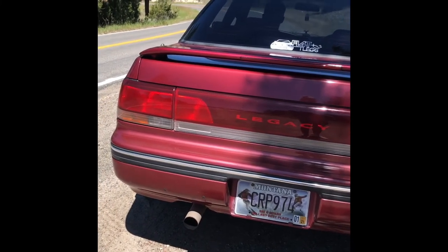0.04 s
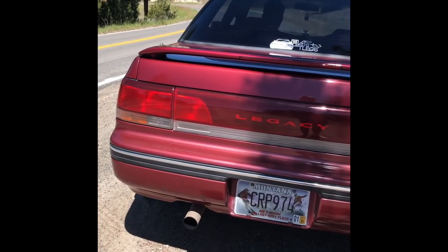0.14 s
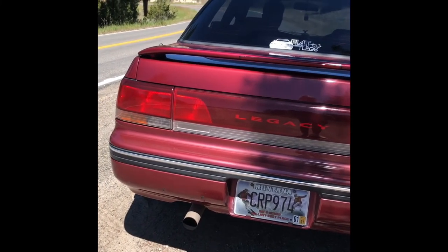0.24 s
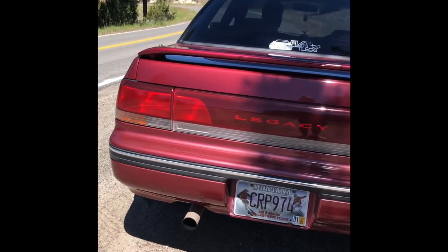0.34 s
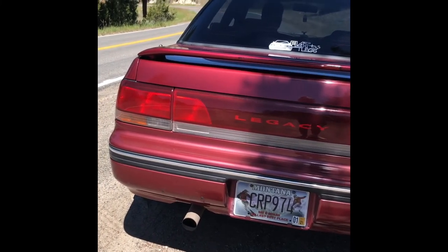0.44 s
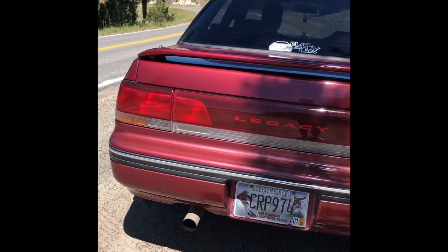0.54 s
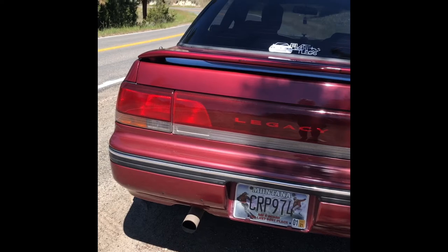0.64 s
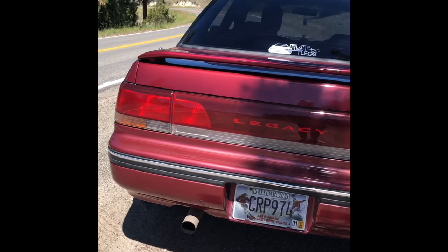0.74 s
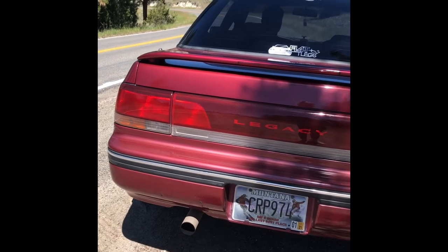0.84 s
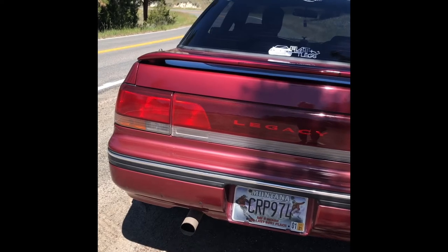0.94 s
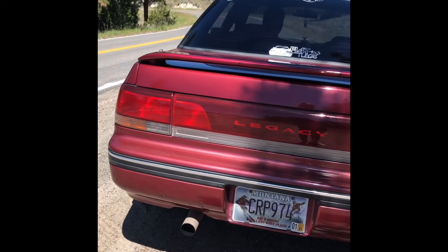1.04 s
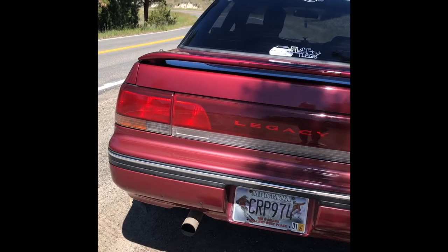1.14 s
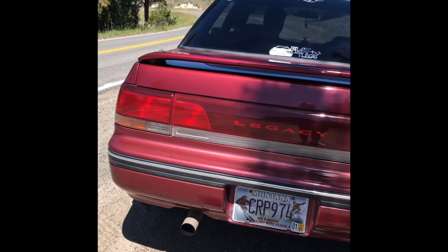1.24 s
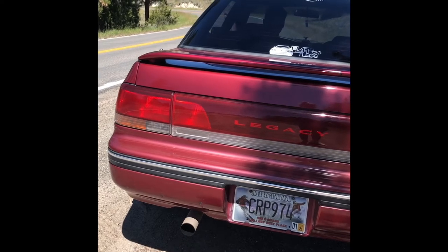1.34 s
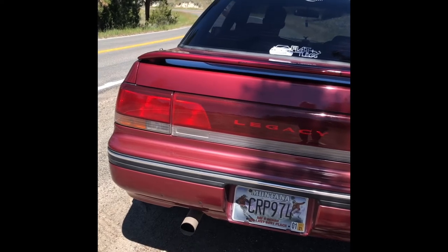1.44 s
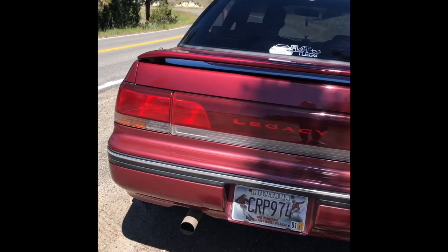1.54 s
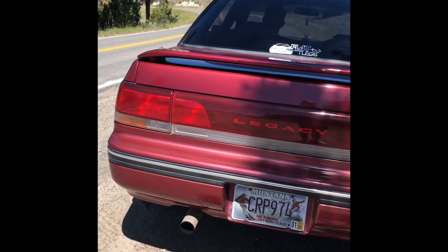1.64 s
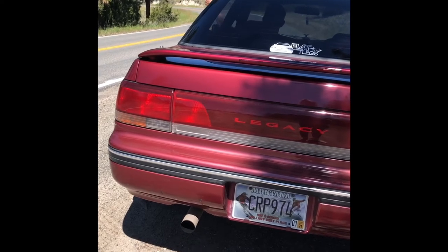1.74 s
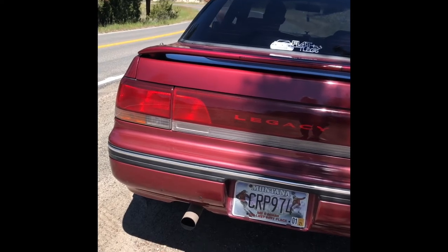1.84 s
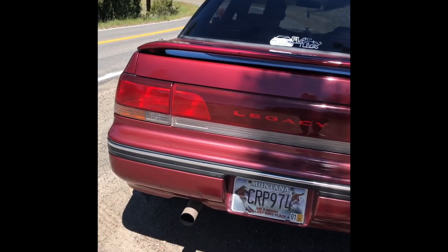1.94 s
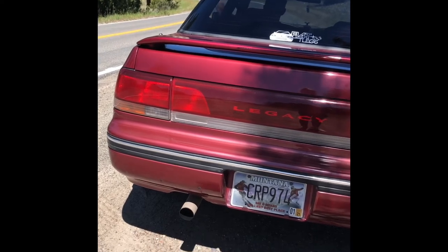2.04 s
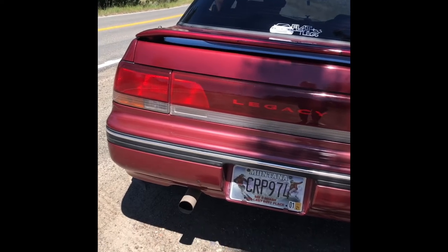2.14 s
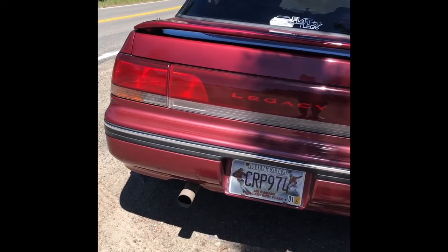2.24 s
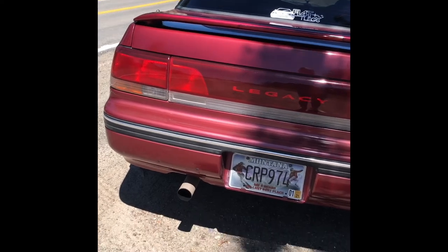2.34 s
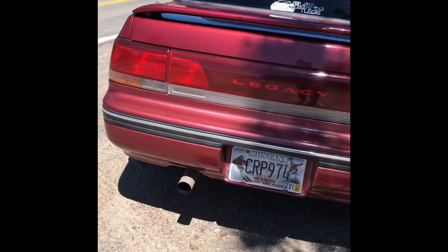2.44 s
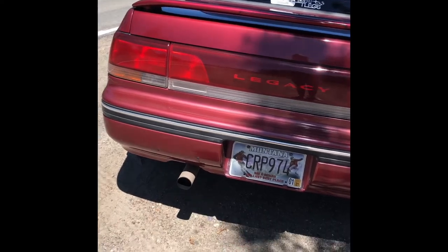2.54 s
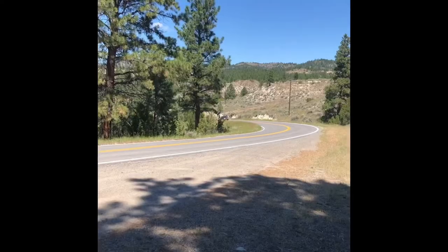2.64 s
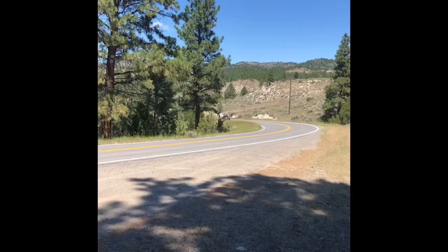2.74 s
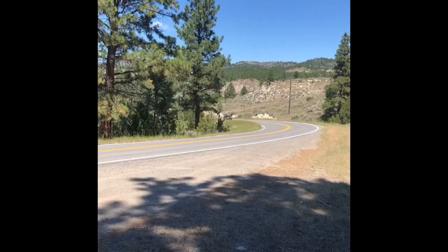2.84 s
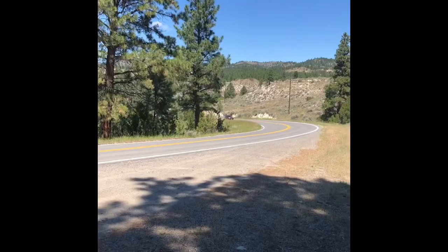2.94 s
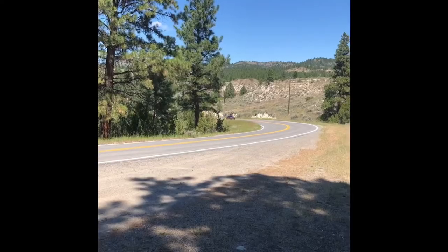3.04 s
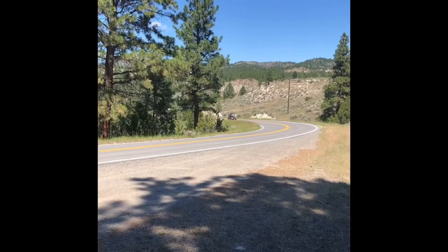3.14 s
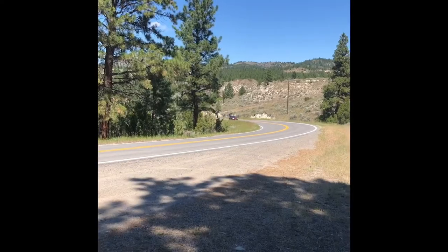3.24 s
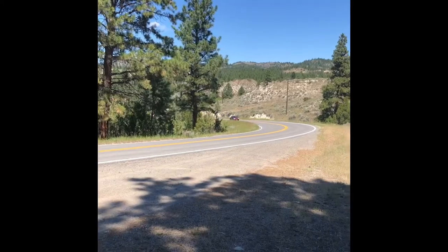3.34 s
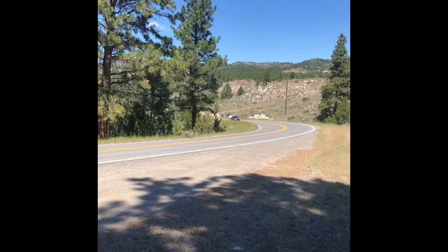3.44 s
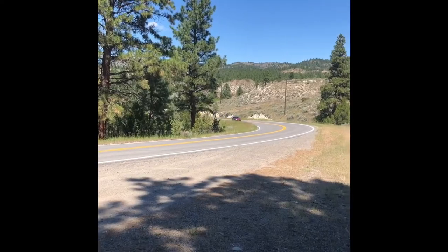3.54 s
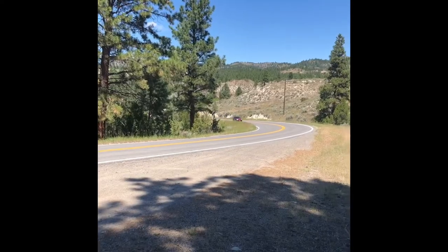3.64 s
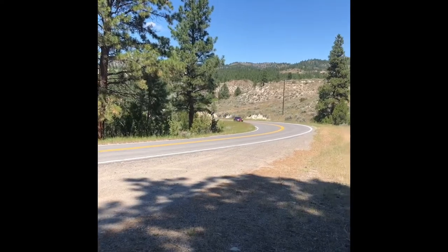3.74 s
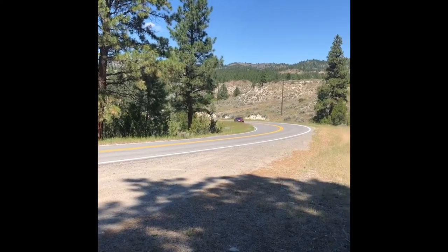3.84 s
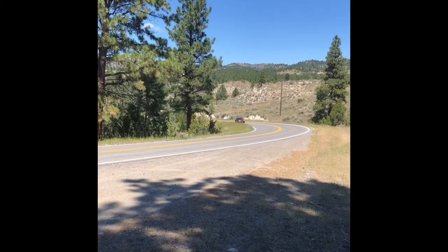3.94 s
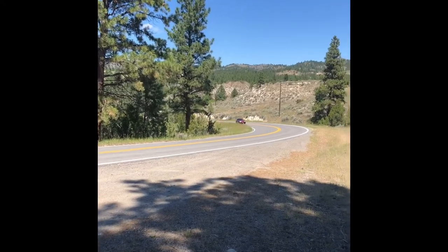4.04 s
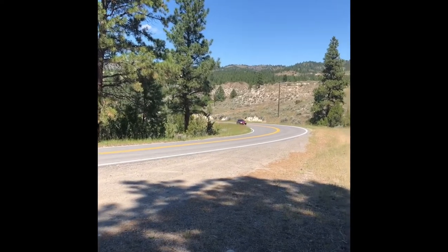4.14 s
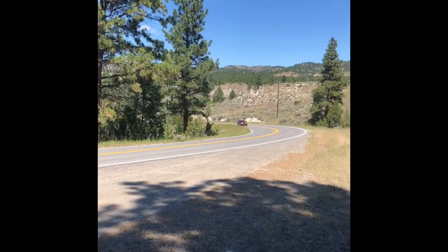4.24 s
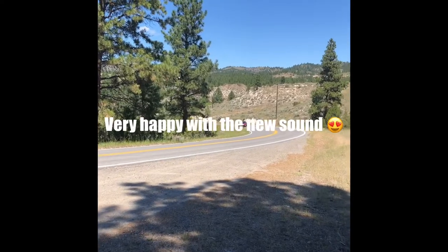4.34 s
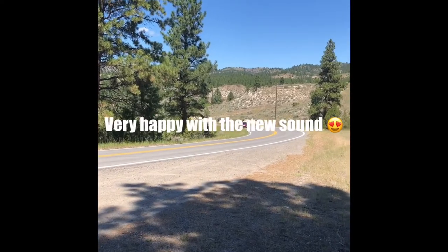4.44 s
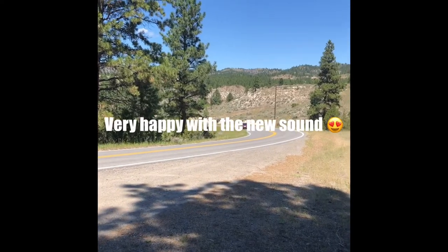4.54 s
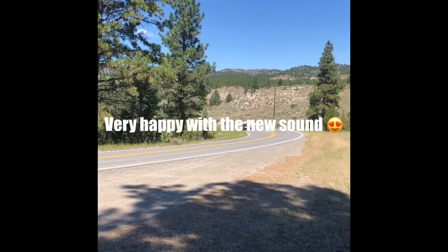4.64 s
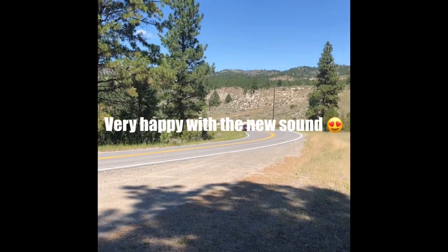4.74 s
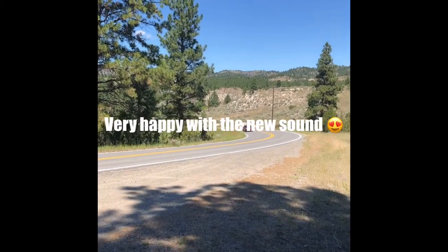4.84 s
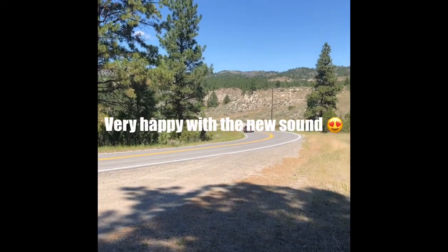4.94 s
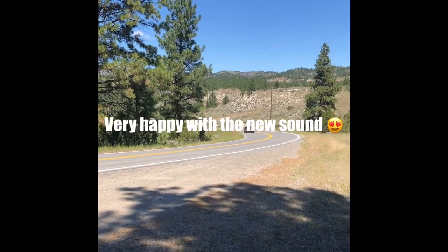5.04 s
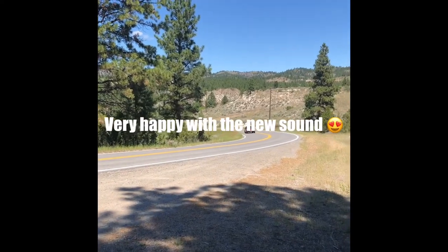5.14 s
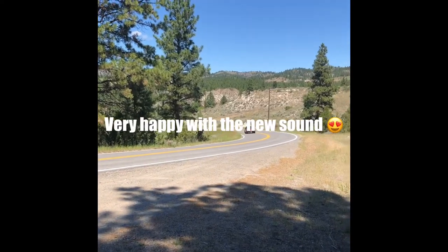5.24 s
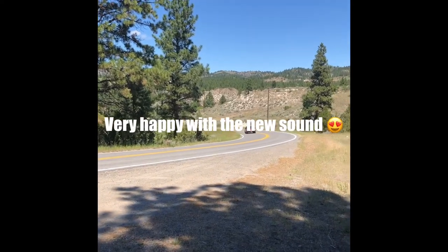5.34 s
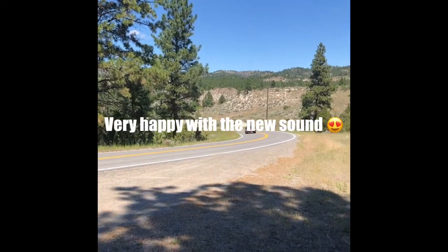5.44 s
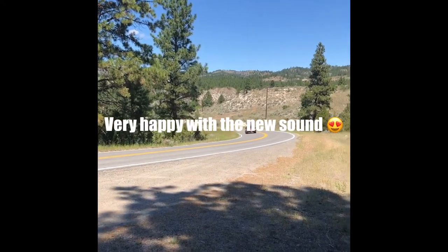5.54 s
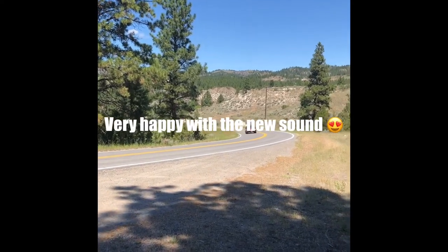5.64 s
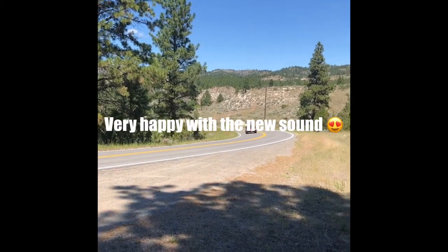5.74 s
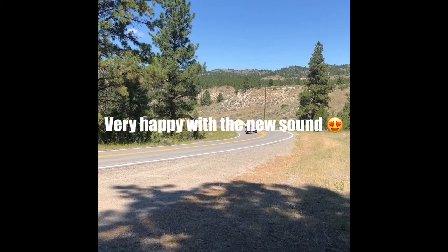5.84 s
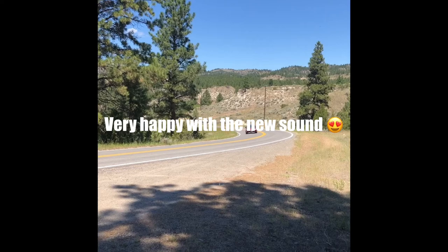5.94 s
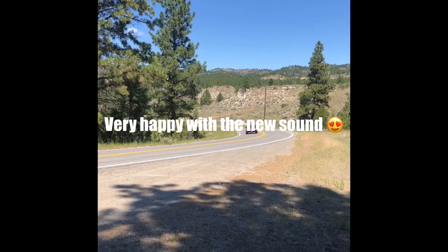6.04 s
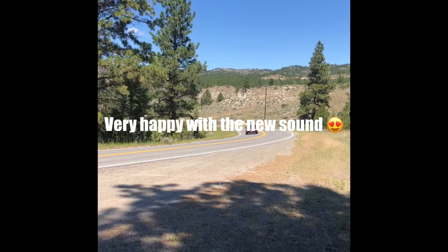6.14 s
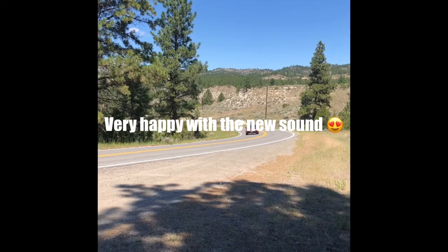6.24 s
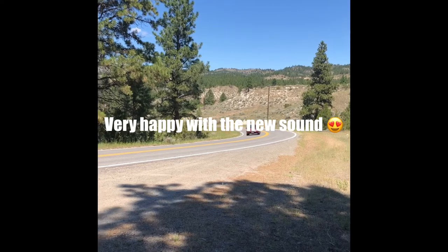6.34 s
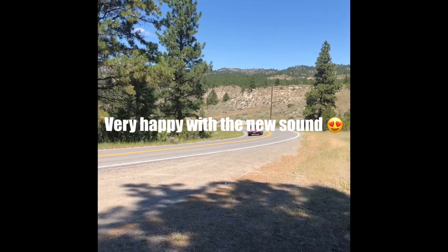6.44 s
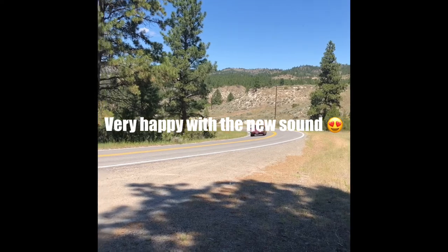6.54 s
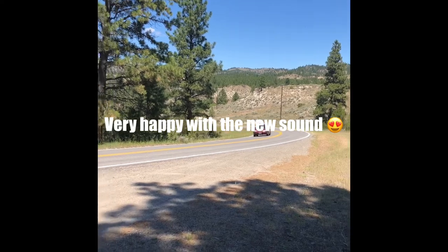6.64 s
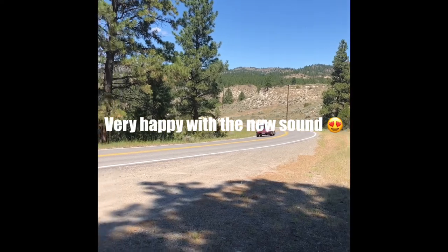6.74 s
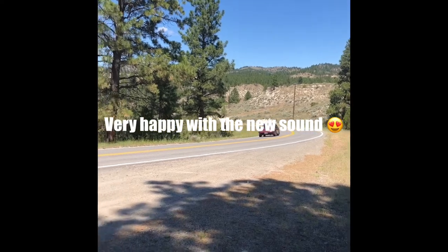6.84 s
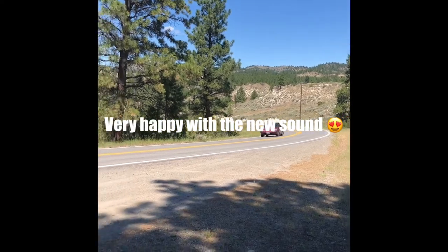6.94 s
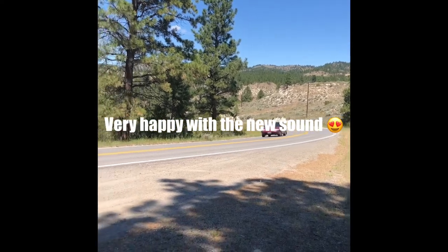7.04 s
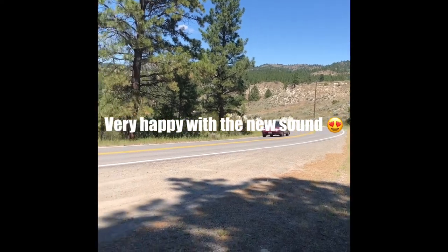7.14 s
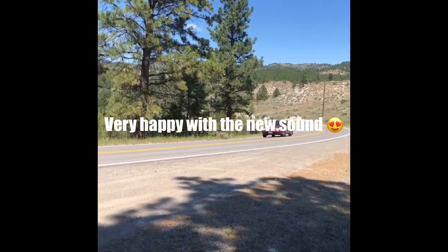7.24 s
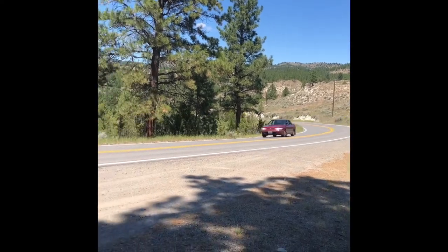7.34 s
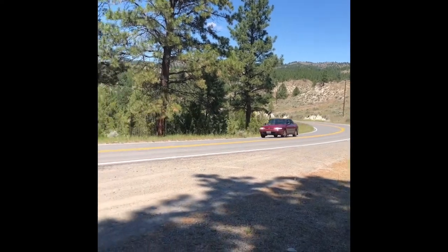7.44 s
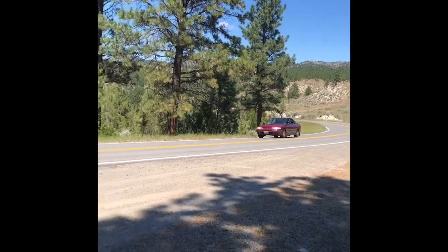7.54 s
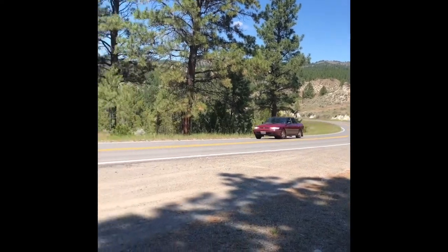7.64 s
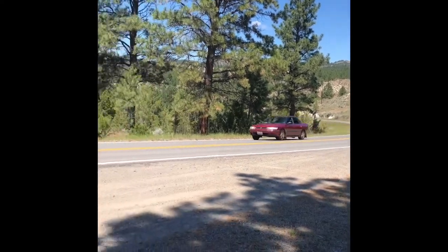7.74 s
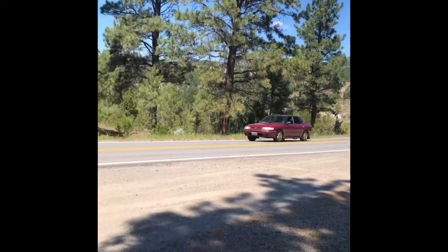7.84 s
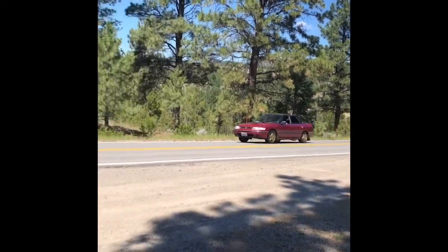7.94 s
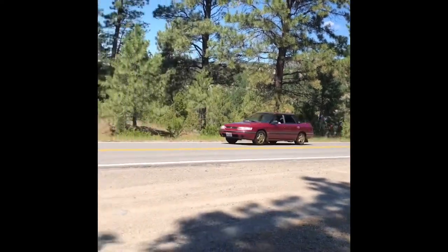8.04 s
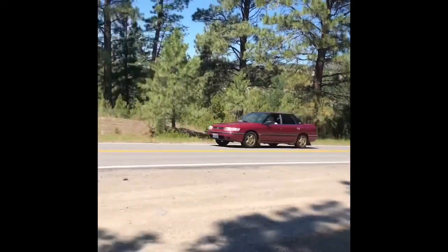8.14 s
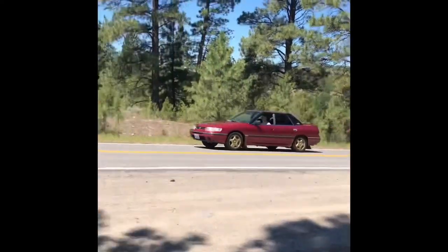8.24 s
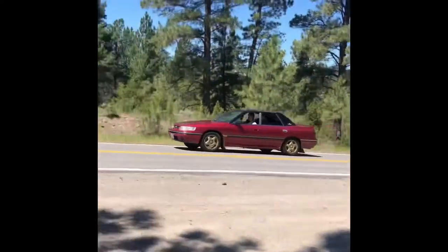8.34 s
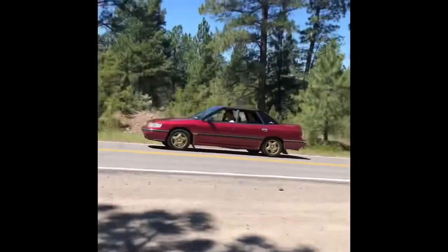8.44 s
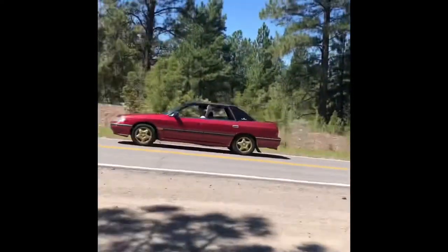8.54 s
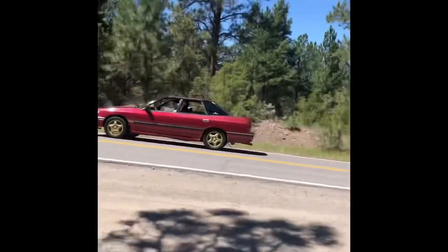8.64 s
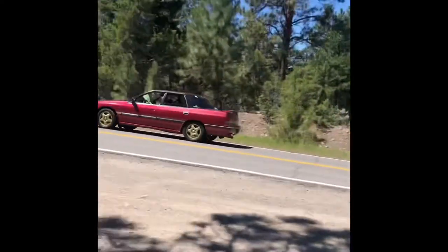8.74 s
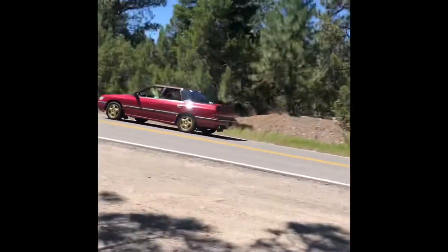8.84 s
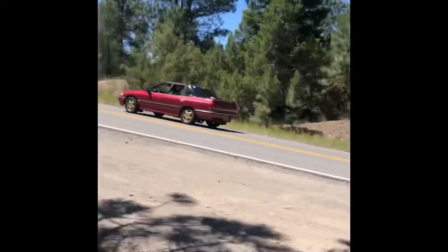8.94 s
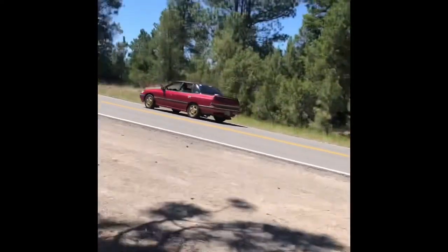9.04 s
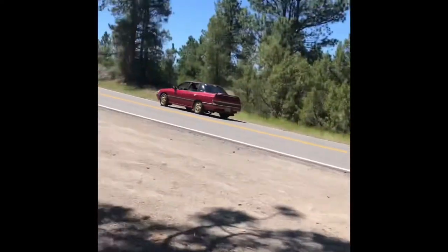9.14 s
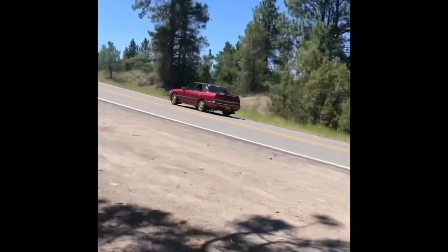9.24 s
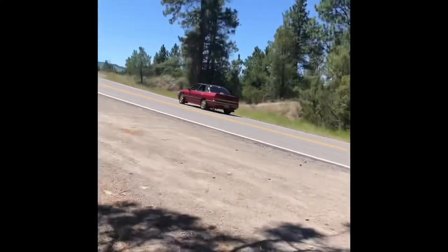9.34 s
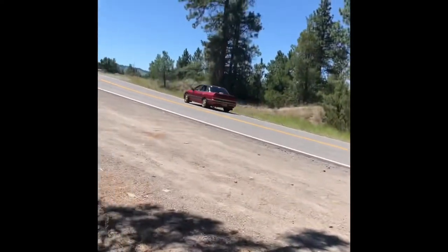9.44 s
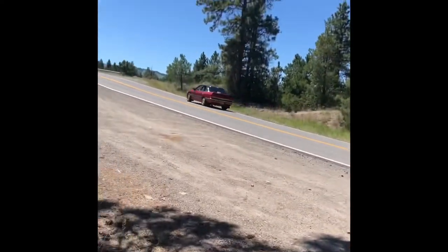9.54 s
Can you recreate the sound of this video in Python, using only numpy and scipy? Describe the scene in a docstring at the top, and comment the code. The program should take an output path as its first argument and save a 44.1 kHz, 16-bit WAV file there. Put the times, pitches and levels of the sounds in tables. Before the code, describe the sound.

Close raspy exhaust burble with crackles and one sharp blip, then a cut to a distant drone, bird chirps, and a loud drive-by.

```python
"""Behind a tailpipe, then beside a mountain road: a turbocharged flat-four with an open exhaust is blipped,
crackling as it runs down; after a cut the car comes from far off, changes gear and passes as a bird calls.
Unequal headers space the four exhaust pulses unevenly, which gives the burble. Engine orders are summed as
cosines; firing clicks and filtered noise make the bark, rasp and gas. Tyres and air are coloured noise, and
the bird is a gliding sine with a scattered tail and one echo."""
import sys
import numpy as np
from scipy import signal
from scipy.fft import rfft, irfft, next_fast_len
from scipy.io import wavfile
from scipy.ndimage import uniform_filter1d

SR = 44100
rng = np.random.default_rng(int(sys.argv[2]) if len(sys.argv) > 2 else 0)


def pcm_store(signal):
    """Save signal as 16-bit PCM."""
    levels = np.round(np.clip(np.atleast_2d(signal), -1, 1) * 32767)
    wavfile.write(sys.argv[1], SR, levels.astype(np.int16).T)


N = 422919
TIME = np.arange(N) / SR
CUT_S = 2.527
CUTOFF_HZ = 15750

# Engine speed, parked and on the road before Doppler shift; one cycle holds four firings:
# (time [s], speed [cycles/s])
PARKED_SPEED = [(0, 32.78), (.5, 26.43), (.68, 24.65), (.8, 24.9), (1.36, 19.15), (1.44, 22.15),
                (1.77, 38.82), (1.85, 36.98), (2.0, 36.1), (2.52, 29.2)]
ROAD_SPEED = [(2.55, 33.33), (3.68, 37.85), (4.0, 34.8), (4.22, 26.14), (9.6, 36.17)]
MID_SPEED = 30  # cycles/s
# Exhaust strokes, unloaded and under load: (place in the cycle [0-1], relative strength [dB])
FREE_FIRING = [(.775, 0), (.0, -4), (.2, -8), (.59, -9)]
LOADED_FIRING = [(.33, 0), (.555, -4), (.79, -9), (.08, -9)]

# Engine orders of the parked car: (multiple of the cycle rate [1], relative level [dB])
FREE_ORDERS = [(2, 2), (3, 4), (4, 10), (5, 11), (6, -10.5), (7, 9), (8, 3), (9, 5.5), (10, -8), (11, 6),
               (12, 3.7), (13, -3), (14, -29), (15, -1), (16, -1)]
# Engine orders of the car in low gear: (multiple of the cycle rate [1], relative level [dB])
LOW_GEAR_ORDERS = [(3, -8.5), (4, -1.5), (5, 0.5), (6, -45), (7, -10.5), (8, -4), (9, -8.5), (10, -38)]
# Engine orders far off, approaching, abreast and leaving:
# (multiple of the cycle rate [1], relative level [dB])
FAR_ORDERS = [(3, -17), (4, 0), (5, -5), (6, -14), (7, -4), (8, 0), (9, -10), (10, -13), (11, -2), (12, -4),
              (13, -9), (14, -17), (15, -17), (16, -18), (17, -16), (18, -22), (19, -17), (20, -22),
              (21, -15)]
APPROACH_ORDERS = [(3, -23), (4, -5.5), (5, -.5), (6, -11.0), (7, -8), (8, -0.5), (9, -2.0), (10, -11.5),
                   (11, 1.5), (12, -5.5), (13, -9), (14, -16.0), (15, -22), (16, -21), (17, -18), (18, -27),
                   (19, -16), (20, -25.5), (21, -15.5)]
ABREAST_ORDERS = [(3, -13.5), (4, -6), (5, 2), (6, -18), (7, -8), (8, -4.5), (9, 0), (10, -16), (11, -10),
                  (12, -24), (13, -15), (14, -39), (15, -17), (16, -37), (17, -14.5), (18, -53), (19, -52),
                  (20, -38), (21, -19.5)]
LEAVING_ORDERS = [(3, -16), (4, -3), (5, 0), (6, -46), (7, -10), (8, 2.5), (9, 2.5), (10, -52), (11, -8),
                  (12, -8), (13, -5), (14, -40), (15, -4), (16, -28), (17, -4), (18, -19), (19, -11),
                  (20, -27), (21, -10), (22, -31), (23, -16), (24, -19), (25, -13.5), (26, -19), (27, -22)]
# Order balance as the car moves along the road: (time [s], order table)
VIEWS = [(4.1, LOW_GEAR_ORDERS), (4.3, FAR_ORDERS), (5.6, FAR_ORDERS), (6.5, APPROACH_ORDERS),
         (7.2, APPROACH_ORDERS), (7.9, ABREAST_ORDERS), (8.4, ABREAST_ORDERS), (8.9, LEAVING_ORDERS)]
# Distinctness of the single pulses as the car nears: (time [s], share [0-1])
NEARNESS = [(6.5, .05), (7.8, 0.27), (8.5, 0.78), (9.0, 0.98)]

# Spectra of the parked exhaust, from its pipe response to its escaping gas:
# (frequency [Hz], relative level [dB])
PIPE = [(45, -35), (65, -26), (85, -3), (115, -12), (150, -4.5), (200, -11), (270, -13), (350, -17),
        (440, -20.5), (560, -19.5)]
BURBLE = [(50, -27), (90, 0), (160, -3), (300, -1.5), (430, -18.5), (600, -32)]
BARK = [(380, -38.5), (470, -4), (560, 4.3), (720, 0.5), (900, 1.3), (1100, -6.5), (1300, -2),
        (1550, -23.5), (2200, -42)]
RASP = [(1200, -20.5), (1600, 3.5), (1900, 1), (2500, -7.5), (3200, -10), (4700, -13), (5800, -19),
        (7500, -32), (12000, -52.5)]
GAS = [(4000, -27), (7000, -1.5), (10000, -4), (15000, -10)]
# Spectra of the exhaust on the road: (frequency [Hz], relative level [dB])
ROAD_BARK = [(250, -37), (450, -4.5), (700, 8), (900, 4.8), (1300, 2), (1700, -5.5), (3000, -26.5),
             (6000, -30), (12000, -65)]
ROAD_RASP = [(1300, -6), (2000, 1), (3000, -1), (4500, -2), (8000, -18)]
# Spectra of tread roar, tread hiss and moving air: (frequency [Hz], relative level [dB])
ROAR = [(100, 9), (250, 13), (500, 9), (900, 2), (1400, 3.8), (1900, 1.8), (3000, -10), (5000, -22),
        (9000, -42)]
TYRE_HISS = [(1800, -4), (3500, 7.5), (5500, 5), (8000, 2), (11000, -2.5), (15500, -7)]
RUMBLE = [(25, -32), (45, -7), (70, -3), (100, -10.5), (160, -3)]

# Backfires and lesser pops; the second row is the first backfire echoed in the pipe: # (time [s], level [dB],
# decay to 1/e [s])
POPS = [(.682, -8.5, 0.0022), (0.685, -19, 0.0049), (0.787, -26, 0.006), (1.794, -20, 0.005),
        (1.839, -25, 0.0063), (1.99, -12.5, .003)]
# Spectrum of a pop: (frequency [Hz], relative level [dB])
POP = [(80, 5), (250, -0.5), (600, 9.5), (1000, 6.5), (1500, -1), (2200, -7.5), (4000, -16), (8000, -34),
       (15000, -46)]
# Gas spurt after the loudest backfire: (time [s], level [dB])
SPURT = [(.705, -100), (.719, -48), (.729, -47), (.75, -100)]
# Spectrum of that spurt: (frequency [Hz], relative level [dB])
SPURT_COLOUR = [(2800, 1), (7000, -3), (15000, -8.5)]
# Echo that hollows the rasp, sooner in hot gas: (time [s], delay [units of 1.013 ms])
PIPE_ECHO = [(0, 1.035), (1.33, 1.04), (1.45, 1.0), (1.72, 0.93), (1.85, 1), (2.5, 1.08)]

# How each tailpipe layer follows the engine: (level at mid speed [dB], slope [dB/octave of speed],
# throttle gain [dB], full boost gain [dB], share of a stumble [1], share of a flare [1])
BOOM_LAW = (-17.5, 3.8, 1.5, -.5, .7, .1)
BARK_LAW = (-29.7, 15.5, 6, -.8, 1, 1.05)
RASP_LAW = (-41, 16, 7.3, -3.5, .8, 1)
GAS_LAW = (-64.8, 3.5, 6, 9.5, .3, 0)
SPOOL_S = .36  # total full-throttle time that brings the turbo to full boost
# Combustion stumbles after the backfire and as the throttle opens or shuts:
# (time [s], half length [s], dip [dB], roughness [0-1])
STUMBLES = [(.8, .06, 8.5, .7), (1.365, .03, 7.5, .15), (1.768, .028, 7, .6), (1.885, .055, 3.5, .85)]
# Fuel burning on in the pipe, which makes the bark flare: (time [s], half length [s], level [dB])
FLARES = [(.36, .12, 6), (1.17, .09, 3), (2.01, .045, 6), (2.48, .1, 4)]

ABREAST_S, CAR_M_PER_S, ROAD_DISTANCE_M, SOUND_M_PER_S = 8.678, 29.8, 14.9, 343
CLUTCH_OUT_S, CLUTCH_IN_S, CLUTCH_TRAVEL_S = 3.71, 4.19, .1
COASTING_BOOM_DB, COASTING_BARK_DB = 1.2, -3.5  # added off the throttle
# Passing of each sound of the car: (time of peak [s], direct level there [dB], half length [s],
# loss per tenfold distance [dB], level lingering in the valley [dB])
BOOM_PASS = (8.85, -13.3, .77, 51.5, -48.6)
BARK_PASS = (8.76, -23, .47, 41.5, -61.5)
ROAR_PASS = (8.92, -26.2, .7, 38, -61.5)
HISS_PASS = (8.76, -36, .55, 61, -83)
# Short rush added to the hiss as the pipe points at the listener:
# (time [s], half length [s], level [dB])
TAILPIPE_RUSH = (8.93, .13, 6.5)
AIR_RUMBLE_DB = -56.5
# Breeze, then the car's wake, buffeting the microphone: (time [s], half length [s], level [dB])
GUSTS = [(4.2, .3, 4), (8.76, .12, 27)]

# Three notes of the bird call: (time after the start [s], frequency [Hz], relative level [dB])
BIRD_NOTES = [
    [(-.029, 3620, -14), (-.022, 4270, -6), (-.014, 5320, -7), (.004, 4900, -14)],
    [(0, 3740, -21), (.01, 3850, 1), (.025, 4730, 0), (.031, 4400, 0), (.062, 3880, -6), (.08, 3550, -27)],
    [(.04, 6300, -25), (.065, 5920, -12), (.12, 4720, -7), (.145, 3920, -2), (.175, 3250, -20)],
]
# Bird calls: (time [s], level [dB])
BIRD_CALLS = [(4.027, -57.5), (5.262, -71), (6.03, -56.5)]


def parked():
    """Pulsed outflow close to the pipe: tonal orders, barking pulses and turbulence dragged by each pulse."""
    speed, = in_time(PARKED_SPEED)
    turns = np.cumsum(speed) / SR
    # the throttle counts as open while the speed climbs
    acceleration = uniform_filter1d(np.gradient(speed) * SR, size=2000)
    throttle = np.clip(acceleration / 30, 0, 1)
    low = parked_boom(turns, speed, throttle)

    clicks = firings(turns, FREE_FIRING, 1 - .5 * throttle, scatter_db=2.0, jitter_s=.00005)
    puffs = rms_one(fade(clicks, decay_s=0.0018)) * rng.standard_normal(N)
    # the flow between the pulses never stops
    flow = (.6 + .4 * throttle) * rng.standard_normal(N)

    # the cylinders differ less in their bark than in their sharp edge
    strokes = rms_one(firings(turns, FREE_FIRING, .5 - .3 * throttle, scatter_db=1.5, jitter_s=.00004))
    bark = colour(strokes + puffs / 6 + flow / 2, BARK, sweep=7.0)
    # a reflection running back and forth in the pipe fills the gaps between the barks
    bark = even(bark + 0.3 * np.interp(TIME - .0036, TIME, bark))

    rasp = colour(.8 * rms_one(clicks) + .8 * puffs + flow, RASP, sweep=1.5)
    echo, = in_time(PIPE_ECHO)
    rasp = even(rasp + 0.51 * np.interp(TIME - echo * 0.001013, TIME, rasp))
    gas = even(colour(puffs + 2 * flow, GAS))

    out = backfires() + spit()
    for law, layer in [(BOOM_LAW, low), (BARK_LAW, bark), (RASP_LAW, rasp), (GAS_LAW, gas)]:
        out += from_db(tailpipe_db(law, speed, throttle)) * layer
    return out


def parked_boom(turns, speed, throttle):
    """Periodic firing gives discrete orders; irregular combustion adds a rough burble."""
    def level_of(k, s):
        # hard pulses carry more of the upper orders
        lift_db = (7.5 < k < 11.5) * 7.5 * np.interp(s, TIME, throttle)
        return order_db(FREE_ORDERS, k) + at_hz(PIPE, k * np.interp(s, TIME, speed)) + lift_db

    # every cylinder moves nearly the same volume
    swept = [(place, 0.23 * db) for place, db in FREE_FIRING]
    lines = boom(turns, speed, swept, level_of, count=16, waver_db=2.87 + throttle, waver_rate=19, sweep=7.0)
    pulses = firings(turns, FREE_FIRING, 0.15, scatter_db=4.5, jitter_s=0.00095)
    burble = even(colour(pulses, BURBLE, sweep=5.975))
    roughness = .09 + .45 * throttle
    roughness += sum(rough * swell(s, half_s) for s, half_s, _, rough in STUMBLES)
    return (lines + roughness * burble) / np.sqrt(1 + roughness ** 2)


def tailpipe_db(law, speed, throttle):
    """Radiated level grows with speed and follows throttle, boost, combustion stumbles and flares."""
    base_db, octave_db, throttle_db, boost_db, stumble_share, flare_share = law
    # the spool only accumulates, so a later opening finds it already turning
    spool = np.minimum(np.cumsum(throttle) / SR / SPOOL_S, 1)
    boost = throttle * spool ** 2
    dips = sum(db * swell(s, half_s) for s, half_s, db, _ in STUMBLES)
    flares = sum(db * swell(s, half_s) for s, half_s, db in FLARES)
    return (base_db + octave_db * np.log2(speed / MID_SPEED) + throttle_db * throttle + boost_db * boost
            - stumble_share * dips + flare_share * flares)


def backfires():
    """Unburnt fuel cracks in the pipe, whose dispersion dulls the crack and makes it trail."""
    burst = np.zeros(N)
    for s, db, decay_s in POPS:
        age = np.maximum(TIME - s, 0)
        burst += from_db(db) * (TIME > s) * np.exp(-np.minimum(age / decay_s, 40))
    crack = colour(burst * rng.standard_normal(N), POP, sweep=3.02)
    return np.sqrt(np.mean(burst ** 2)) * crack


def spit():
    """Turbulent outflow: a brief spurt of gas hisses after the loudest backfire."""
    spurt_db, = in_time(SPURT)
    return from_db(spurt_db) * noise(SPURT_COLOUR)


def driving():
    """Directivity and distance: the exhaust changes colour as it passes; far off its pulses smear in the trees."""
    speed = in_time(ROAD_SPEED)[0] * doppler()
    turns = np.cumsum(speed) / SR
    near, = in_time(NEARNESS)
    # off the throttle for the gear change, the note dulls and flutters
    coasting = after(CLUTCH_OUT_S) - after(CLUTCH_IN_S)
    boom_db = passing_db(BOOM_PASS) + COASTING_BOOM_DB * coasting
    bark_db = passing_db(BARK_PASS) + COASTING_BARK_DB * coasting

    def level_of(k, s):
        facing_db = np.interp(s, [at for at, _ in VIEWS], [order_db(orders, k) for _, orders in VIEWS])
        dull_db = -6.5 * np.log2(k) * np.interp(s, TIME, coasting)
        hz = k * np.interp(s, TIME, speed)
        return facing_db + dull_db + drone_db(hz, centre_hz=597.3, width_hz=47.5, peak_db=9)

    lines = boom(turns, speed, LOADED_FIRING, level_of, count=27,
                 waver_db=2.93 - near + 2.8 * coasting, waver_rate=9, sweep=7.0)
    clicks = firings(turns, LOADED_FIRING, 1, scatter_db=1.2, jitter_s=.00004)
    puffs = rms_one(fade(clicks, decay_s=0.0031)) * rng.standard_normal(N)
    blast = near * (rms_one(clicks) + .3 * puffs) + (1.2 - near) * rng.standard_normal(N)
    bark = even(colour(blast, ROAD_BARK, sweep=7.0))
    # the strongest pulses steepen in the pipe into sharp cracks
    rasp = even(colour(rms_one(clicks ** 2) + 1.1 * puffs, ROAD_RASP, sweep=1.43))
    return from_db(boom_db) * lines + from_db(bark_db) * bark + near * from_db(bark_db - 16.0) * rasp


def drone_db(hz, centre_hz, width_hz, peak_db):
    """Resonance: a narrow mode of the exhaust lifts each order that glides through it."""
    return peak_db * np.exp(-((hz - centre_hz) / width_hz) ** 2)


def doppler():
    """Doppler effect: pitch is raised while the car comes and lowered as it leaves."""
    along_m = CAR_M_PER_S * (TIME - ABREAST_S)
    receding = along_m / np.hypot(along_m, ROAD_DISTANCE_M)
    return 1 / (1 + CAR_M_PER_S / SOUND_M_PER_S * receding)


def passing_db(row):
    """Distance loss along a straight path, with a steady part scattered back by the hillsides."""
    s, db, half_s, loss_db, far_db = row
    direct_db = db - loss_db * np.log10(np.hypot(1, (TIME - s) / half_s))
    return 20 * np.log10(np.hypot(from_db(direct_db), from_db(far_db)))


def after(s):
    """A linear transition from 0 to 1 while the clutch pedal travels."""
    return np.clip((TIME - s) / CLUTCH_TRAVEL_S + .5, 0, 1)


def tyres():
    """Tread noise: its low roar carries far, while its hiss fades fast with distance."""
    roar = from_db(passing_db(ROAR_PASS) + drift(25) / 2) * noise(ROAR)
    s, half_s, rush_db = TAILPIPE_RUSH
    hiss_db = passing_db(HISS_PASS) + rush_db * swell(s, half_s) + 1.4 * drift(40)
    return roar + from_db(hiss_db) * noise(TYRE_HISS)


def bird():
    """Frequency-modulated tones: two short notes and a long falling whistle, scattered and echoed."""
    out = np.zeros(N)
    for start, call_db in BIRD_CALLS:
        for note in BIRD_NOTES:
            s, hz, db = np.transpose(note)
            age = np.arange(s[0], s[-1], 1 / SR)
            pitch = np.interp(age, s, hz) * (1 + 0.0136 * rng.standard_normal())
            tone = np.sin(2 * np.pi * np.cumsum(pitch) / SR)
            at = round((start + s[0]) * SR)
            out[at:at + len(age)] += from_db(call_db + np.interp(age, s, db)) * tone
    out *= from_db(3.1 * drift(120))
    # the trees scatter the call into a tail that loses 60 dB in 0.32 s
    trees = rng.standard_normal(SR) * from_db(-60 * TIME[:SR] / 0.32)
    scattered = signal.fftconvolve(out, trees / np.linalg.norm(trees))[:N]
    hillside = np.interp(TIME - .405, TIME, out + scattered)
    return out + .45 * scattered + from_db(-16) * hillside


def air():
    """Turbulent pressure: a light breeze and the car's wake rumble at the microphone."""
    gust_db = sum(db * swell(s, half_s) for s, half_s, db in GUSTS)
    return from_db(AIR_RUMBLE_DB + gust_db + 1.5 * drift(8.6)) * noise(RUMBLE)


def boom(turns, speed, pattern, level_of, count, waver_db, waver_rate, sweep):
    """Fourier synthesis: engine orders as cosines, phased by the firing pattern and pipe dispersion."""
    out, coarse = np.zeros(N), TIME[::64]
    for k in range(2, count + 1):
        phase = np.angle(sum(from_db(db) * np.exp(-2j * np.pi * k * place) for place, db in pattern))
        waver = np.interp(coarse * waver_rate, np.arange(1024), rng.standard_normal(1024))
        depth_db = np.interp(coarse, TIME, waver_db * np.ones(N))
        gain = from_db(level_of(k, coarse) + depth_db * waver)
        line = np.cos(2 * np.pi * k * turns + phase - sweep * np.log(k * speed))
        out += np.interp(TIME, coarse, gain) * line
    return even(out)


def order_db(orders, k):
    """Harmonic amplitude: the listed level of one order, or -60 dB if it is not listed."""
    index = k - round(orders[0][0])
    return orders[index][1] if 0 <= index < len(orders) else -60


def firings(turns, pattern, contrast, scatter_db, jitter_s):
    """Impulse excitation: one varied click per exhaust stroke; contrast scales cylinder differences."""
    clicks = np.zeros(N)
    for place, db in pattern:
        chance = rng.standard_normal((400, 2))
        s = np.interp(np.arange(len(chance)) + place, turns, TIME, right=np.inf)
        s = s + jitter_s * chance[:, 0]
        heard = (s > 0) & (s < TIME[-1])
        at = (s[heard] * SR).astype(int)
        clicks[at] += from_db(db * (contrast * np.ones(N))[at] + scatter_db * chance[heard, 1])
    return clicks


def fade(clicks, decay_s):
    """Exponential decay: every click dies away to 1/e in decay_s."""
    return signal.lfilter([1], [1, -np.exp(-1 / (decay_s * SR))], clicks + 1e-18)


def colour(x, points, sweep=0.):
    """Linear filtering, falling off beyond the table; sweep delays the lows, as dispersion in a long pipe."""
    size = next_fast_len(N + SR)
    hz = np.maximum(np.fft.rfftfreq(size, 1 / SR), 1)
    low_end = 1 + (.7 * points[0][0] / hz) ** 6
    high_end = 1 + (.7 * hz / points[-1][0]) ** 6
    ends = 1 / np.sqrt(low_end * high_end)
    response = from_db(at_hz(points, hz)) * ends * np.exp(-1j * sweep * np.log(hz))
    return rms_one(irfft(rfft(x, size) * response, size)[:N])


def noise(points):
    """Random excitation: steady noise of one colour."""
    return colour(rng.standard_normal(N), points)


def even(x):
    """Short-time power normalisation: steady over a few cycles, leaving the single pulses."""
    power = uniform_filter1d(uniform_filter1d(x ** 2, size=3000), size=3000)
    return x / np.sqrt(np.maximum(power, 1e-9))


def drift(rate):
    """Random modulation: chance values joined by lines, rate of them a second, with RMS 1."""
    return rms_one(np.interp(TIME * rate, np.arange(4096), rng.standard_normal(4096)))


def swell(s, half_s):
    """Gaussian envelope: a smooth rise and fall around one moment, of height 1."""
    return np.exp(-((TIME - s) / half_s) ** 2)


def from_db(db):
    """Decibel law: level to amplitude."""
    return 10 ** (np.asarray(db) / 20)


def rms_one(x):
    """Power normalisation: scales a signal to RMS 1."""
    return x / np.sqrt(np.mean(x ** 2) + 1e-20)


def in_time(rows):
    """Linear interpolation: each column of a table as a curve in time."""
    s, *columns = np.transpose(rows)
    return [np.interp(TIME, s, c) for c in columns]


def at_hz(points, hz):
    """Logarithmic frequency scale: a spectrum interpolated between its points."""
    f, db = np.transpose(points)
    return np.interp(np.log(hz), np.log(f), db)


def scene():
    """Superposition: the parked car fades out quickly, then the roadside sounds fade in."""
    close = np.clip((CUT_S - TIME) / 0.022, 0, 1)
    roadside = np.clip((TIME - CUT_S) / 0.018, 0, 1)
    return (close * parked() + roadside * (driving() + tyres() + bird() + air()))[None]


def record(dry):
    """Saturation and band limiting: peaks are rounded, the top is cut."""
    top = 0.6
    rounded = top * np.tanh(dry / top)
    return signal.sosfilt(signal.ellip(10, .2, 80, CUTOFF_HZ, fs=SR, output="sos"), rounded)


dry = scene()
out = record(dry)
pcm_store(out)
```